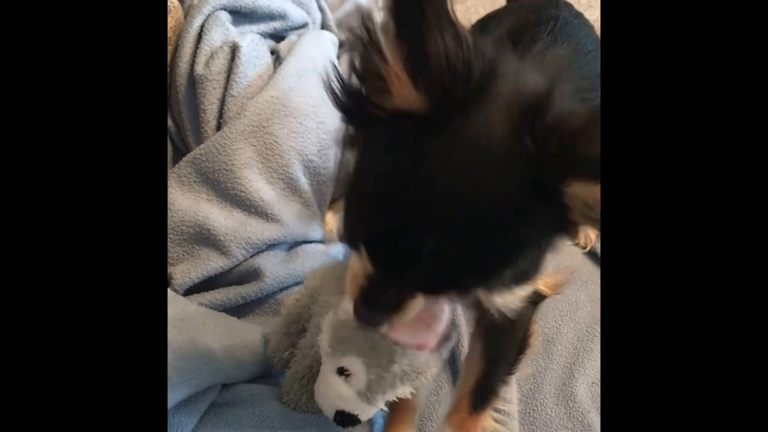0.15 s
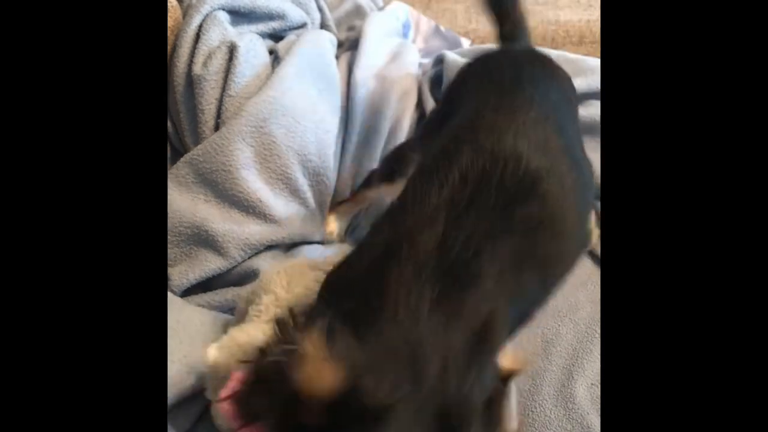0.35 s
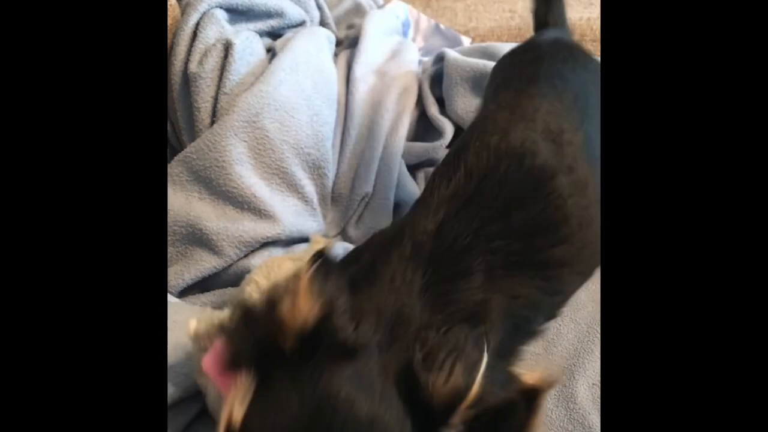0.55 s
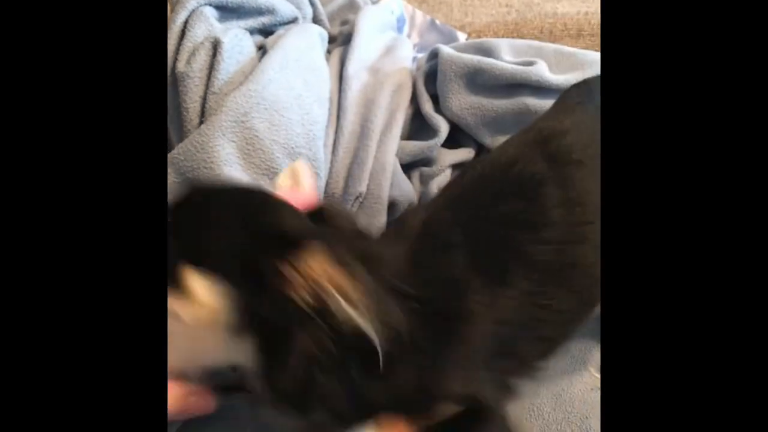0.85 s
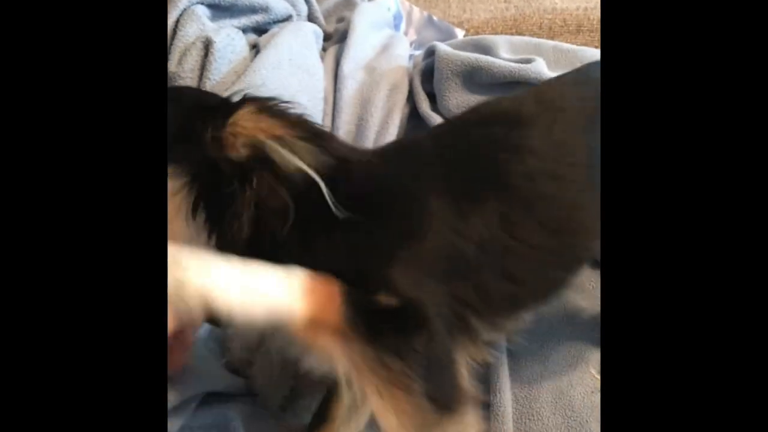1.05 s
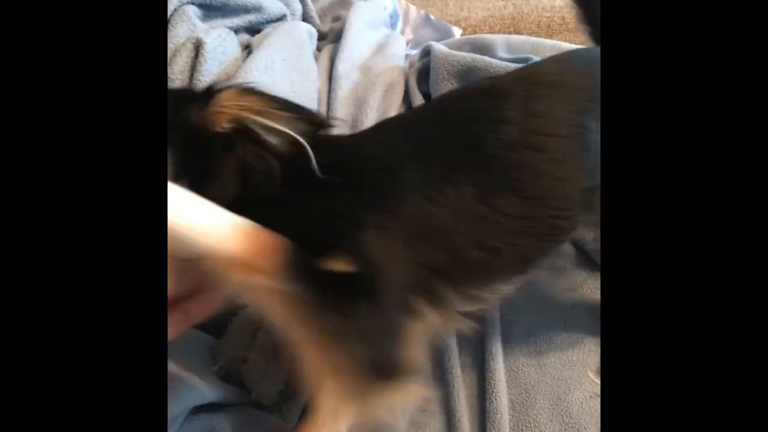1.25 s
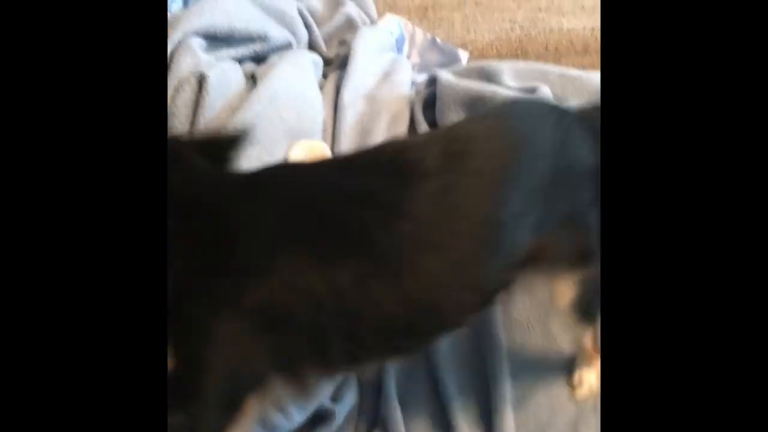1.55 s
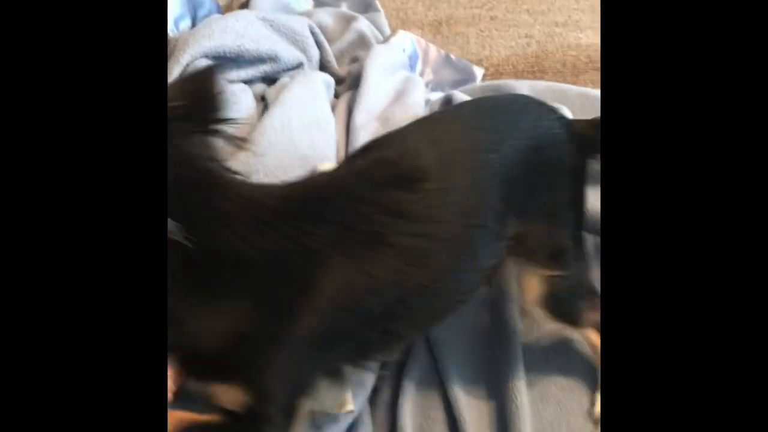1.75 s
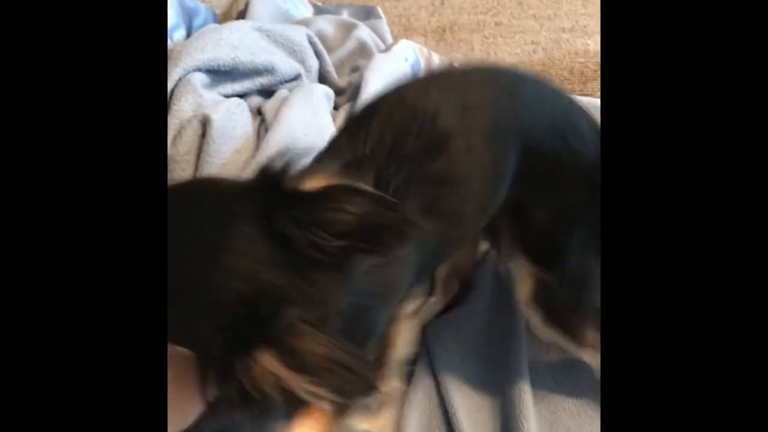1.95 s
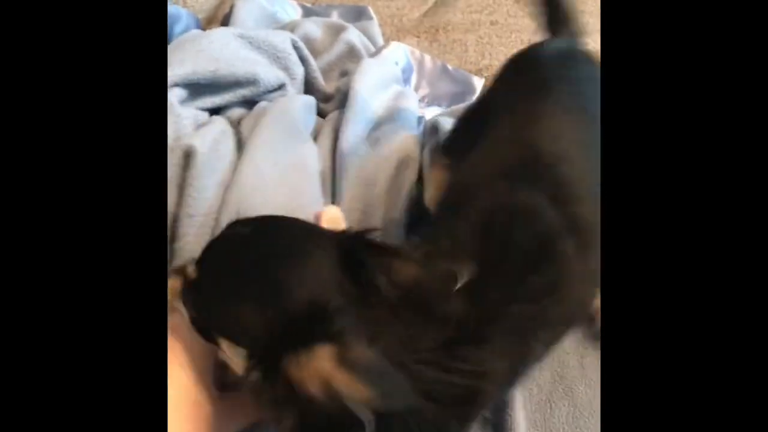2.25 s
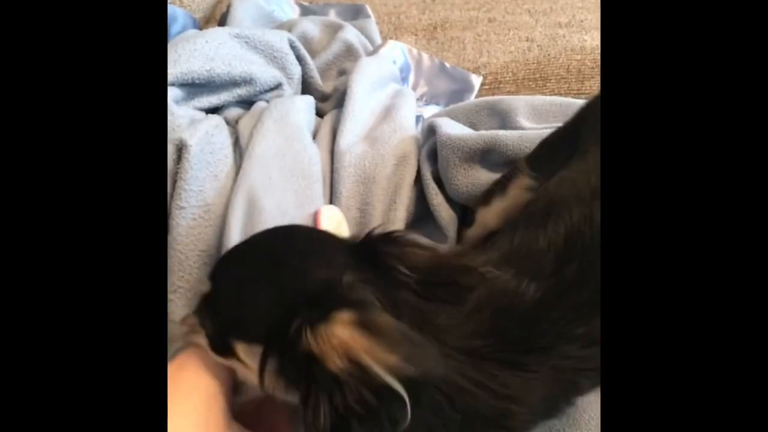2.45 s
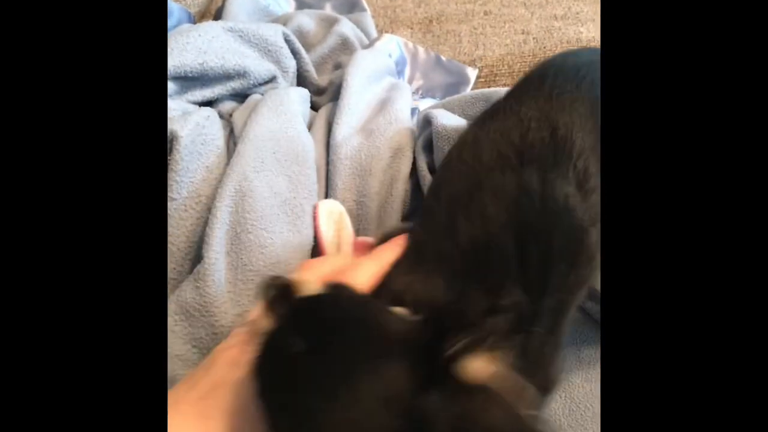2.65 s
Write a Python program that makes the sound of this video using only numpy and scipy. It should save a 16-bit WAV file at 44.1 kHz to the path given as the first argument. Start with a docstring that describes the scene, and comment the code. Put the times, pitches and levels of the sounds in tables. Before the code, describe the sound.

Three raspy growls from a small dog at play, the middle one longest and sinking to a slow rattle, with slight tooth ticks, nose puffs and cloth brushes between; close, dry indoor sound over faint low rumble.

```python
"""Teeth click on a plush toy over a quiet room's rumble, then a small dog, close by, growls three times.
Each growl is a run of uneven vocal-fold pulses ringing in throat and mouth.
The voice keeps catching, brightens as the mouth opens, and hisses where the lips draw back.
Clicks are short filtered ticks; puffs through the nose and brushes of cloth are swells of coloured noise.
A short, dull room tail follows the dog."""
import sys
import numpy as np
from scipy import signal
from scipy.fft import rfft, irfft
from scipy.io import wavfile

SR = 44100
rng = np.random.default_rng(int(sys.argv[2]) if len(sys.argv) > 2 else 0)


def wrap_up_sound(samples):
    """Save the sound to the file named by the first command line argument, as 16-bit audio."""
    columns = np.atleast_2d(samples).T
    # keep every value between -1 and 1, then stretch to whole-number steps
    tamed = np.clip(columns, -1, 1)
    steps = np.round(tamed * 32767).astype(np.int16)
    wavfile.write(sys.argv[1], SR, steps)


N = 123479
TIME = np.arange(N) / SR
FRAME = 1024   # samples in one pulse or tick
FREQS = np.maximum(np.arange(FRAME // 2 + 1) * SR / FRAME, 20)   # Hz
SKIRT = 1.57   # steepness of the resonance flanks

# Unevenness of the vocal-fold pulses. Each row: time in seconds, roughness [0-1].
ROUGHNESS = [(.6, 0.4), (.88, 0.85), (1.0, 0.47), (1.7, 0.3), (2.2, 0.98), (2.45, 0.62)]


def from_db(db):
    """Decibels to gain."""
    return 10 ** (np.asarray(db) / 20)


def rms_one(x):
    """Scale to an rms of one."""
    return x / np.sqrt(np.mean(np.abs(x) ** 2) + 1e-20)


def at(rows, s):
    """Every column of a table at the given time, gliding from row to row."""
    times, *columns = np.transpose(rows)
    return np.array([np.interp(s, times, column) for column in columns])


def during(t, spans, fade_s):
    """One inside the spans and zero outside, with soft edges."""
    return sum(np.tanh((t - start) / fade_s) - np.tanh((t - end) / fade_s) for start, end in spans) / 2


def add(out, s, sound):
    """Mix a short sound in at a time."""
    start = int(s * SR)
    out[start:start + len(sound)] += sound[:N - start]


def resonance(freqs, hz, q, skirt):
    """Gain of one resonance, 1 on top."""
    detuning = freqs / hz - hz / freqs
    return (1 + (q * detuning) ** 2) ** (-skirt / 2)


def causal(gain):
    """The minimum-phase response with these gains: a sharp start, then ringing."""
    cepstrum = irfft(np.log(gain + 1e-9))
    cepstrum[1:FRAME // 2] *= 2
    cepstrum[FRAME // 2 + 1:] = 0
    return np.exp(rfft(cepstrum))


def burst(decay_s):
    """Spectrum of a quickly dying spurt of noise."""
    decay = np.exp(-np.arange(FRAME) / SR / decay_s)
    return rms_one(rfft(rng.standard_normal(FRAME) * decay))


def noise(gain_at):
    """Noise with a given colour, rms one."""
    freqs = np.maximum(np.arange(N // 2 + 1) * SR / N, 1)
    white = rfft(rng.standard_normal(N))
    return rms_one(irfft(white * gain_at(freqs), N))


def background():
    """Quiet room: noise shaped into steady low rumble and faint hiss."""
    # Colour of the quiet room. Each row: frequency in Hz, noise density in dB per Hz (relative).
    floor_colour = [(15, -62), (25, 0), (102, -1.5), (394, -15), (700, -19), (2550, -29), (16000, -37.5)]
    level_db = -58
    hz, db = np.transpose(floor_colour)
    return from_db(level_db) * noise(lambda f: from_db(np.interp(np.log(f), np.log(hz), db)))


def teeth():
    """Teeth on the toy: dry ticks from one broad resonance, each with a very short gritty tail."""
    # Teeth clicks. Each row: start in seconds, peak level in dB, ring in Hz.
    clicks = [(.177, -37.5, 7650), (.2004, -23, 5420), (0.2169, -35, 2570), (1.067, -42.5, 6800),
              (1.888, -37, 2300), (1.907, -41.5, 2250), (1.941, -42.5, 2470)]
    click_q, tail_s, tail_db = 1.97, 0.001, -3
    out = np.zeros(N)
    for s, db, hz in clicks:
        ring = causal(resonance(FREQS, hz, click_q, skirt=1.6))
        tick = irfft(ring * (1 + from_db(tail_db) * burst(tail_s)))
        add(out, s, from_db(db) * tick / np.abs(tick).max())
    return out


def puffs():
    """Puffs of air and brushes against toy and blanket: swells of hiss, each round one resonance."""
    # Puffs and brushes. Each row: centre in seconds, half-length in seconds, level in dB,
    # resonance in Hz, sharpness [Q].
    swells = [(0.229, 0.0059, -51, 830, 0.12), (0.648, 0.0096, -50, 5840, 4.5),
              (0.708, 0.012, -53, 6430, 5.5), (0.709, 0.035, -58, 2630, 0.51),
              (0.688, 0.041, -54.5, 120, 0.3), (1.963, 0.066, -62.5, 340, 0.35),
              (1.904, 0.17, -66.5, 4100, 0.49), (1.999, 0.015, -61, 2700, 0.84),
              (2.664, 0.034, -62.5, 1950, 2.9)]
    out = np.zeros(N)
    for s, half_s, db, hz, q in swells:
        swell = np.exp(-((TIME - s) / half_s) ** 2 / 2)
        out += from_db(db) * swell * noise(lambda f: resonance(f, hz, q, skirt=2.35))
    return out


def growl(pitch, gesture, colour_db, attack_s):
    """The folds slap shut once a cycle; every slap and its spurt of air ring through the tract."""
    # The voice catches, slower and weaker for a cycle or two. Each row: time in seconds, dip in dB.
    catches = [(0.398, 8.5), (0.429, 4), (0.461, 5), (.526, 7.5), (0.598, 5), (0.914, 5), (2.164, 5),
               (2.197, 13), (2.237, 4.5), (2.273, 4), (2.411, 5.5)]
    catch_s, catch_slows = 0.0054, .045   # half-width; share of pitch lost per dB
    # The lips draw back and the growl hisses through the teeth. Each row: start and end in seconds.
    snarls = [(1.314, 1.544), (2.333, 2.519)]
    snarl_db = np.array((5, -5, 17.5, 4.5, 12.5, 22, 6))   # change in each register
    # The mouth is shut on the toy and muffles the growl. Each row: start and end in seconds.
    muffles = [(.8, 1.066), (1.615, 1.85)]
    # How far each register follows the mouth's opening, chest to upper nose [dB per dB].
    follows_opening = np.array((0.045, -0.31, 0.48, 0.94, 0.47, 0.0075, 0.00091))
    jitter_s, shimmer_db = .00035, 0.58   # scatter in timing and level at full roughness
    rasp_hz, rasp_s = 6860, 0.002   # breath outweighs the slap above this; decay of each spurt
    lag_s, lag_hz = 0.0009, 818   # the lows swell a moment after each slap

    t = TIME[(TIME >= pitch[0][0]) & (TIME <= pitch[-1][0])]
    dip_db = sum(db * np.exp(-((t - s) / catch_s) ** 2) for s, db in catches)
    snarl = during(t, snarls, fade_s=0.096)
    muffle_db = 13 * during(t, muffles, fade_s=0.0073)   # taken off the opening
    swell_in_db = 6.5 * np.exp((t[0] - t) / attack_s)
    die_away_db = 15 * np.exp((t - t[-1]) / 0.012)
    fade_db = swell_in_db + die_away_db

    rate = at(pitch, t)[0]
    cycles = np.floor(np.cumsum(rate * np.exp(-catch_slows * dip_db)) / SR)
    airy = FREQS ** 2 / (FREQS ** 2 + rasp_hz ** 2)
    lag = np.exp(-2j * np.pi * lag_s * lag_hz * np.arctan(FREQS / lag_hz))

    out = np.zeros(N)
    for i in np.flatnonzero(np.diff(cycles, prepend=-1)):   # one slap per new cycle
        rough, = at(ROUGHNESS, t[i])
        effort_db, opening_db = at(gesture, t[i]) - [fade_db[i], muffle_db[i]]
        levels_db = effort_db + np.array(colour_db) + opening_db * follows_opening + snarl[i] * snarl_db
        source = np.sqrt(1 - airy) + np.sqrt(airy) * burst(rasp_s)
        shimmer = shimmer_db * rough * rng.standard_normal()
        # the root keeps the loudness even as the pitch moves
        strength = from_db(shimmer - dip_db[i]) * np.sqrt(SR / rate[i])
        pulse = irfft(source * lag * causal(tract(t[i], levels_db, opening_db)))
        jitter = jitter_s * rough * rng.standard_normal()
        add(out, t[i] + jitter, -strength * pulse)
    return out


def tract(s, levels_db, opening_db):
    """Gain of throat and mouth for one pulse: nine resonances in seven registers, each with its level."""
    # Resonances moved by jaw and lips. Each row: time in seconds, chest in Hz, two mouth tones in Hz,
    # teeth in Hz.
    postures = [(.39, 280, 1886, 1840, 3520), (.45, 274, 1830, 1820, 4320), (.65, 284, 1740, 2330, 4090),
                (.85, 445, 1330, 1540, 4250), (.91, 290, 1070, 1490, 4150), (1.06, 342, 1610, 1800, 3980),
                (1.2, 302, 1760, 2190, 4430), (1.45, 335.8, 1710, 2200, 3400),
                (1.68, 310, 1600, 2050, 3640), (1.78, 407, 1520, 2180, 3740), (2.2, 306, 1430, 1560, 4080),
                (2.36, 285, 1480, 1790, 4300), (2.48, 295, 1550, 1980, 4220)]
    # The drifting throat resonance. Each row: time in seconds, throat in Hz.
    throat_drift = [(.62, 598), (.85, 702), (1.05, 660), (1.67, 577), (1.76, 690), (2.3, 616.4)]
    # Sharpness of the nine resonances, from chest to upper nose [Q].
    sharpness = (1.6, 5.46, 4.3, 4.9, 6.3, 5.3, 5.4, 9.2, 17)
    # Register that each of the nine resonances belongs to [index, chest to upper nose].
    register_of = (0, 1, 2, 3, 3, 4, 4, 5, 6)
    upper_throat_hz = 924   # fixed centre that the upper throat wobbles around
    nose_hz = (8300, 12100)   # the two nose resonances stay put
    wobble = 0.039   # share of pitch, at full roughness
    chest_leak_db, treble_leak_db = -24.5, -8   # broad base under the lowest and the top resonances

    chest, *mouth, teeth_hz = at(postures, s)
    throat = np.array([chest, *at(throat_drift, s), upper_throat_hz])
    # only chest, throat and upper throat wobble, pulse by pulse
    throat = throat * (1 + wobble * at(ROUGHNESS, s) * rng.standard_normal(len(throat)))
    # the teeth resonance parts in two as the mouth opens
    split = 0.064 * from_db(.35 * opening_db)
    tuning = [*throat, *mouth, teeth_hz * (1 - split), teeth_hz * (1 + split), *nose_hz]

    registers = np.zeros((len(levels_db), len(FREQS)))
    for hz, q, k in zip(tuning, sharpness, register_of):
        peak = resonance(FREQS, hz, q, SKIRT) * resonance(FREQS, hz, q * 0.47, 0.91)
        registers[k] += peak ** 2
    registers[0] += (from_db(chest_leak_db) * resonance(FREQS, hz=170, q=1.0, skirt=2.3)) ** 2
    registers[-1] += from_db(treble_leak_db) ** 2
    registers /= registers.mean(axis=1, keepdims=True)

    colour_scatter_db = 1.0 * rng.standard_normal(len(levels_db))   # pulse to pulse
    power = from_db(levels_db + colour_scatter_db) ** 2 @ registers
    return np.sqrt(power + lips(s))


def lips(s):
    """Power of the narrow resonances gliding in the gap between drawn-back lips and teeth."""
    # Lip glides. Each row: start and end in seconds, first and last pitch in Hz, level in dB.
    lip_glides = [(.5, .65, 5100, 5540, -61), (1.154, 1.384, 5300, 5000, -61),
                  (1.294, 1.465, 11500, 9700, -67), (1.315, 1.491, 9400, 7800, -64),
                  (1.399, 1.598, 6750, 5470, -61.5), (1.409, 1.588, 15000, 14400, -65.5),
                  (1.473, 1.623, 9300, 8650, -66), (2.35, 2.502, 6400, 5430, -62.5)]
    power = 0
    for start, end, from_hz, to_hz, db in lip_glides:
        hz = np.interp(s, [start, end], [from_hz, to_hz])
        peak = rms_one(resonance(FREQS, hz, q=8, skirt=SKIRT))
        presence = during(s, [(start, end)], fade_s=0.017)
        power = power + (from_db(db) * presence * peak) ** 2
    return power


def growls():
    """Three growls, each with its own pitch, effort, colour and attack."""
    # Pulse rate of each growl before the catches slow it, from first pulse to last.
    # Each row: time in seconds, rate in Hz.
    pitches = [
        [(.387, 143.7), (.412, 172.6), (.445, 156.8), (.51, 154.6), (.55, 162.2), (.62, 153.3), (.652, 122.7)],
        [(.848, 182), (.886, 139.9), (1.03, 143.3), (1.17, 136.8), (1.23, 133.6), (1.27, 122), (1.31, 119.5),
         (1.43, 147), (1.52, 133.7), (1.56, 138.9), (1.65, 124.5), (1.70, 122.8), (1.745, 107), (1.775, 47.3),
         (1.798, 44.83)],
        [(2.131, 131), (2.2, 132.7), (2.255, 148.6), (2.3, 138.2), (2.35, 165.7), (2.39, 140.8), (2.44, 150.2),
         (2.51, 137.4), (2.548, 78.1)],
    ]
    # Effort and mouth opening through each growl, before fades and muffling.
    # Each row: time in seconds, voice in dB, opening as brightness in dB.
    gestures = [
        [(0.385, -36, -16.5), (0.509, -36, -4), (0.655, -37, -2.5)],
        [(0.845, -36, -14.5), (1.181, -38.5, -2.5), (1.8, -45, -13)],
        [(2.13, -33, -14.5), (2.48, -36, -22), (2.545, -38.5, -2)],
    ]
    # Colour of each growl with the mouth wide open. Each row: chest, throat, upper throat, mouth,
    # teeth, nose and upper nose, all in dB.
    colours = [(3, -5, -5.5, -3.5, -1, -21.5, -22.5), (0.5, -11.5, -56, 1.5, -18, -55, -32),
               (-2.5, -15, -19, -3.5, -25, -53.5, -35)]
    # How fast each growl swells in [s].
    attacks_s = (0.018, 0.017, 0.0053)
    return sum(growl(*controls) for controls in zip(pitches, gestures, colours, attacks_s))


def room(x):
    """Softly furnished room: a weak tail of dying noise with the highs rolled off."""
    t = TIME[:SR // 2]
    t60_s, dull_hz, level_db = 0.071, 3120, -10   # the level is set before the dulling
    tail = rng.standard_normal(len(t)) * from_db(-60 * t / t60_s) * (t > .004)
    tail = tail / np.linalg.norm(tail)
    tail = signal.sosfilt(signal.butter(1, dull_hz, fs=SR, output="sos"), tail)
    return from_db(level_db) * signal.fftconvolve(x, tail)[:N]


def scene():
    """The dog close up, with the room behind it."""
    dog = growls() + teeth() + puffs()
    return (dog + room(dog) + background())[None]


def record(dry):
    """The top is cut steeply above 16.1 kHz."""
    return signal.sosfilt(signal.ellip(10, .2, 80, 16100, fs=SR, output="sos"), dry)


dry = scene()
out = record(dry)
wrap_up_sound(out)
```